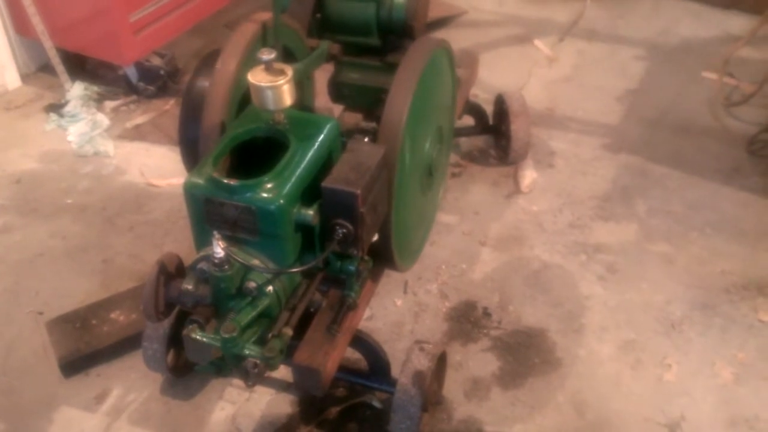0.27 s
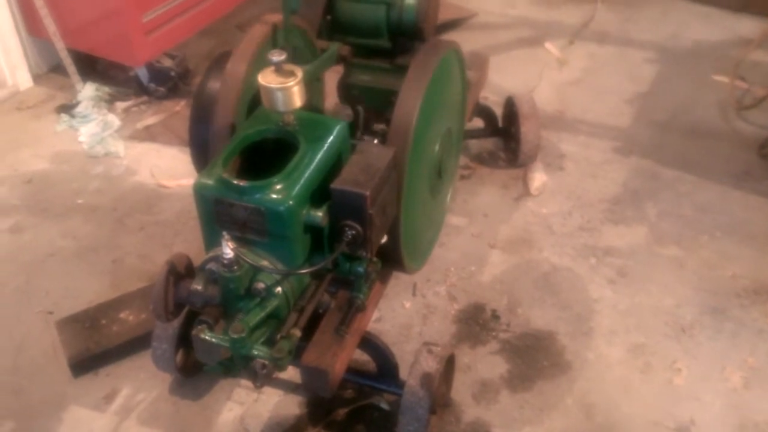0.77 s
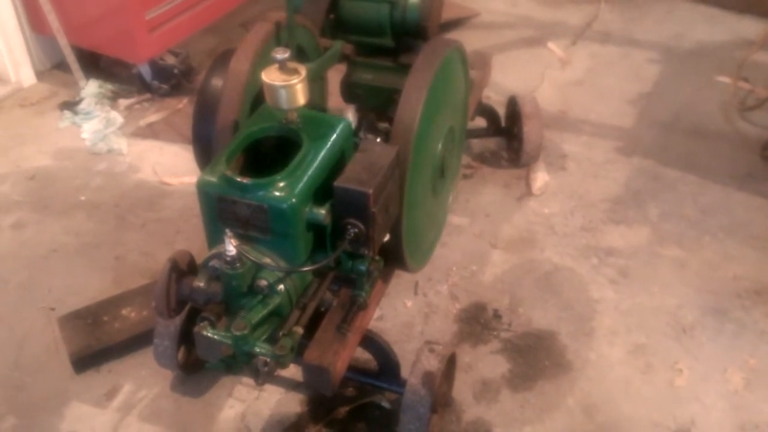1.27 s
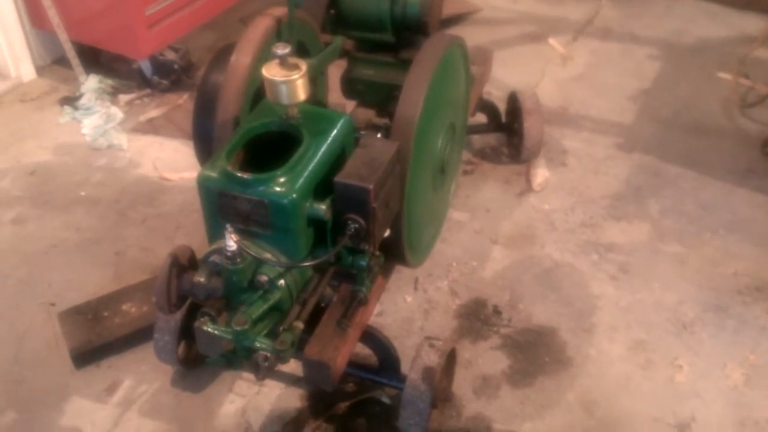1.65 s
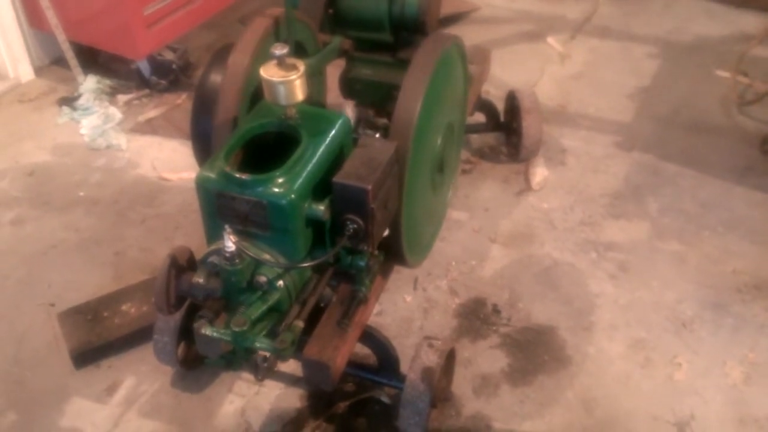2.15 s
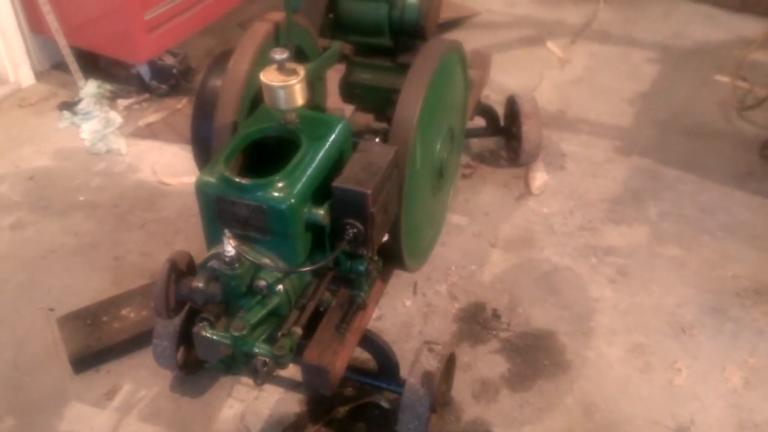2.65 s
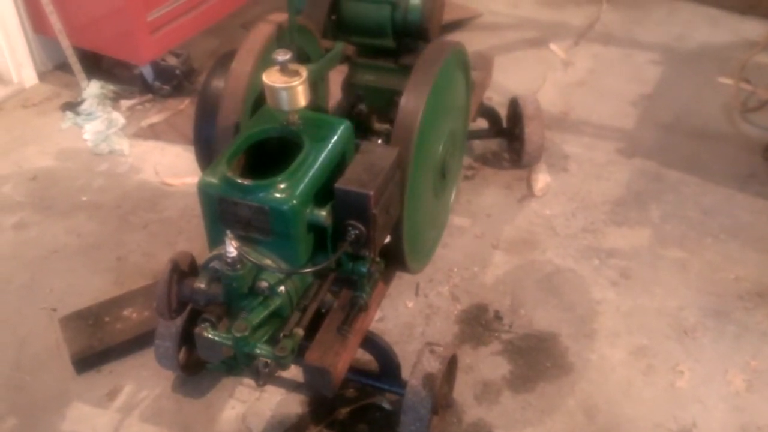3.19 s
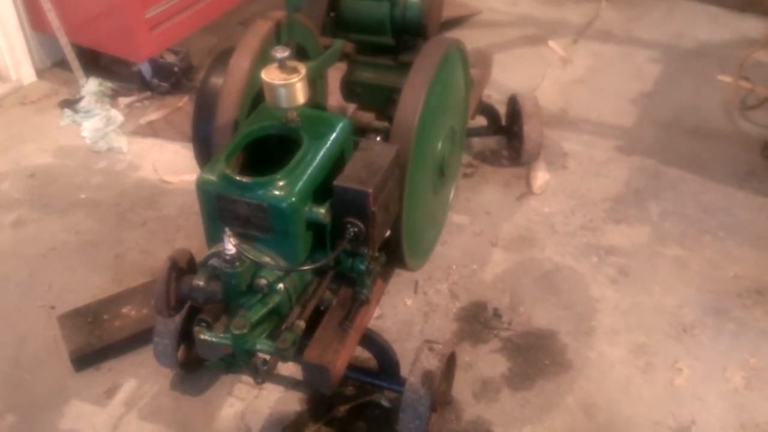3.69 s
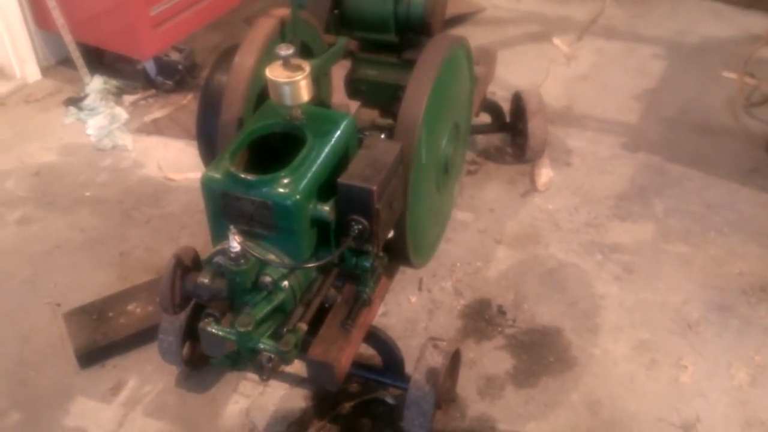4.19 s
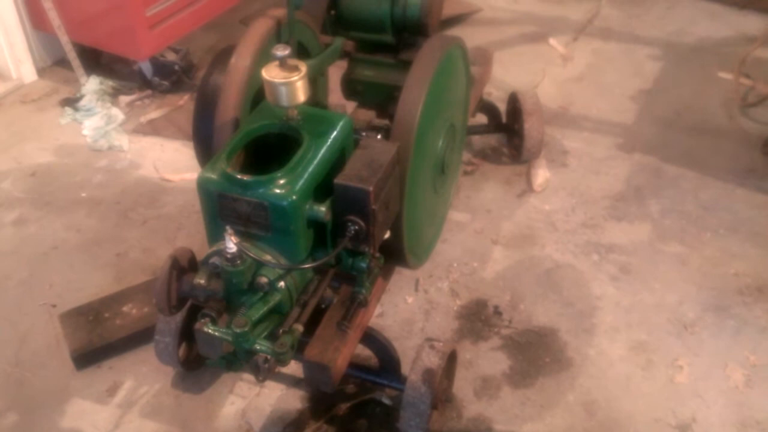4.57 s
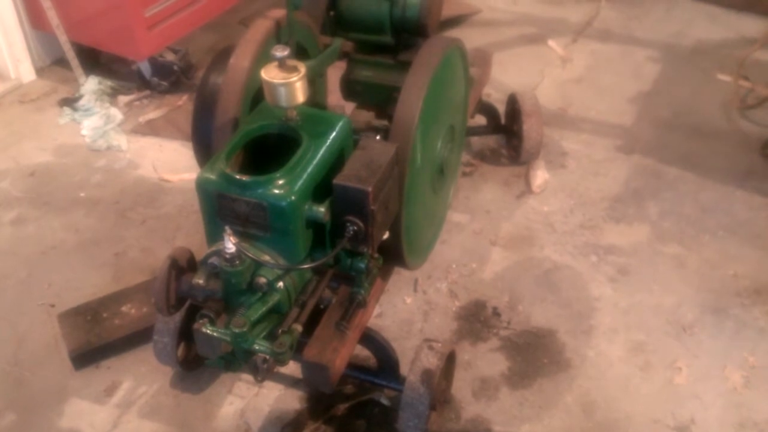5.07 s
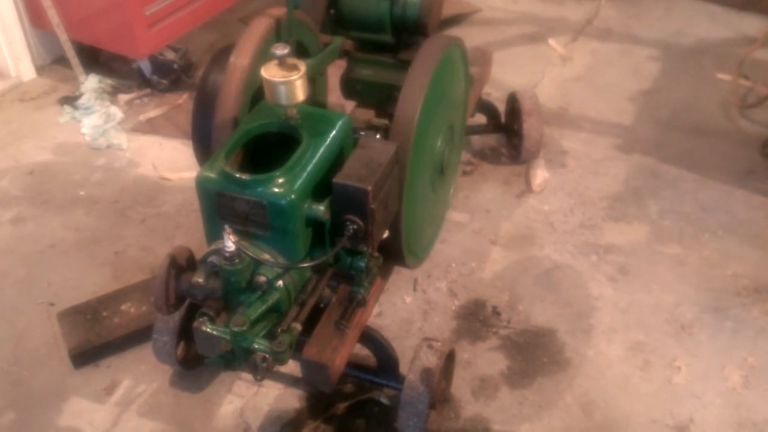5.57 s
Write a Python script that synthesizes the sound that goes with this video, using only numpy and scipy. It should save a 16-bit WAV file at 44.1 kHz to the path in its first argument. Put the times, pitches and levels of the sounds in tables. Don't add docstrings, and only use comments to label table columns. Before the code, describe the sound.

A slow old single-cylinder engine in a hard garage, close and wide, with slightly unlike left and right microphones. A valve clack opens the scene, then at about 0.27 s comes a sharp rising pop and a clipped blast of gas, roaring brightly for a tenth of a second and fading over the next quarter second into a diffuse room tail. It then coasts: faint gear rattle and low hum, husky pipe breaths near 270 Hz, flywheel knocks, small ticks, and latch clacks at 0.7, 1.15 and 1.7 s. A brief gasp at 1.55 s precedes a loud tick and a rush of intake hiss with a low snoring flutter at 1.8-2.0 s; valve clacks at 1.74 and 2.0 s and quick trip clicks lead to the second bang at 2.24 s, its pop duller. The cycle repeats to the strongest blast at 4.21 s, then coasts again, with another intake rush near 5.75 s.

```python
import sys
import numpy as np
from scipy import signal
from scipy.fft import rfft, irfft, next_fast_len
from scipy.io import wavfile
from scipy.ndimage import uniform_filter1d

SR = 44100
rng = np.random.default_rng(int(sys.argv[2]) if len(sys.argv) > 2 else 0)


def transcribe(signal):
    frames = np.atleast_2d(signal).T
    limited = np.clip(frames, -1, 1)
    pcm = np.round(limited * 32767).astype(np.int16)
    wavfile.write(sys.argv[1], SR, pcm)


def field_ratio(decibels):
    return 10 ** (np.asarray(decibels, dtype=float) / 20)


N = 257527
T, SIZE = np.arange(N) / SR, next_fast_len(N + SR)
HZ = np.maximum(np.arange(SIZE // 2 + 1) * SR / SIZE, 1)
APART = np.array([[0], [2.2]])

CYCLE_START = [-1.702, .268, 2.238, 4.208]
# time [s], pop level [dB], blast level [dB].
FIRING = [
    (0.268, -8, 0.0),
    (2.237, -10.5, -0.4),
    (4.211, -8.5, 0.17),
]
# pitch [Hz], level [dB], t60 [s].
FRAME_RING = [(1377, -5, 0.011), (1645, 9.5, 0.082), (2036, 0, 0.023), (2390, 7.5, 0.11),
              (3400, 1.5, 0.034), (4370, -0.5, 0.043), (6320, -23, 0.14), (10540, -20, 0.013)]
# frequency [Hz], density [dB per Hz].
INTAKE_COLOUR = [(290, -45), (500, -1.5), (1120, -19), (1190, -19), (2370, 2), (3070, 2), (3550, 7.5),
                 (9040, 4), (10400, 1.5), (15600, -5.5)]


def over_hz(table, column=1):
    table = np.array(table)
    return np.interp(np.log(HZ), np.log(table[:, 0]), table[:, column])


def unit(gain):
    return gain / np.sqrt(np.mean(np.abs(gain) ** 2))


def through(x, gain):
    return irfft(rfft(x, SIZE) * gain, SIZE)[..., :N]


def peak(hz, width_hz):
    return 1j * HZ * width_hz / (hz ** 2 - HZ ** 2 + 1j * HZ * width_hz)


def curve(spans, fade=0.0052):
    out = np.zeros(N)
    for rows in spans:
        s, db = np.transpose(rows)
        fade_in = np.clip((T - s[0]) / fade, 0, 1)
        fade_out = np.clip((s[-1] - T) / (10 * fade), 0, 1)
        out += field_ratio(np.interp(T, s, db)) * fade_in * fade_out
    return out


def noise(rough_db, rate):
    hold = int(SR / rate)
    flicker = uniform_filter1d(np.repeat(rng.standard_normal(N // 20 + 1), hold)[:N], hold)
    return rng.standard_normal((2, N)) * field_ratio(rough_db * flicker)


def each(rows, starts=CYCLE_START):
    return [np.array(rows) + start * np.eye(len(rows[0]))[0] for start in starts]


def played(rows, starts=CYCLE_START):
    scatter_db = 1.36
    rows = np.concatenate(each(rows, starts))
    is_level = rows < -5
    rows = rows + scatter_db * rng.standard_normal(rows.shape) * is_level
    return rows[(rows[:, 0] > 0) & (rows[:, 0] < N / SR)]


def iron(ring, crack_db):
    # frequency [Hz], density [dB per Hz].
    crack = [(180, -19), (300, -7.5), (1110, -4), (2410, 3.5), (4030, -1.5), (4670, -1.5), (7070, -14.5),
             (11000, -31), (15600, -36.5)]
    modes = 0
    for k, (hz, db, t60) in enumerate(ring):
        width_hz = np.log(1000) / np.pi / t60
        modes = modes + (-1) ** k * field_ratio(db) * peak(hz, width_hz)
    return unit(modes) + field_ratio(crack_db) * unit(field_ratio(over_hz(crack)))


def hits(rows, body, gain_db, rise):
    split_hz, treble_rise = 7000, 0.0038
    low, high, t = np.zeros(N + SR), np.zeros(N + SR), T[:SR // 3]
    for s, treble_db, db, t60 in rows:
        start = max(int((s - 0.51 * rise) * SR), 0)
        span = slice(start, start + len(t))
        fall_db = -60 * t / max(t60, .005)
        low[span] += field_ratio(db + gain_db + fall_db) * np.minimum(t / rise, 1)
        high[span] += field_ratio(treble_db + gain_db + 2 * fall_db) * np.minimum(t / treble_rise, 1)
    bounces = noise(0.97, 700)
    treble = 1 / (1 + (split_hz / HZ) ** 6)
    swell = through(low[:N] * bounces, unit(body * (1 - treble)))
    return swell + through(high[:N] * bounces, unit(body * treble))


def gears():
    # time into the cycle [s], level [dB].
    mesh = [(.0, -17), (.085, -13.5), (.21, -33.5), (.58, -32.5), (.93, -35), (1.06, -46), (1.3, -37.5),
            (1.6, -35.5), (1.86, -32)]
    # frequency [Hz], density [dB per Hz].
    hum_colour = [(15, -44), (25, -2), (55, -36), (96, 7), (184, 3), (412, -5.5), (484, 4), (539, 3),
                  (1670, 0), (3750, -9), (5040, -57.5), (5620, -101), (15600, -30)]
    load = field_ratio(np.interp(T, *np.concatenate(each(mesh)).T))
    teeth = field_ratio(-11) * through(noise(5.5, 300) * load, unit(iron(FRAME_RING, 2.46)))
    floor = field_ratio(-53.5) * through(noise(6.7, 8.5), unit(peak(231, 45) + .5 * peak(111, 23)))
    hum = field_ratio(-47.5) * through(noise(4.4, 22), unit(field_ratio(over_hz(hum_colour))))
    return teeth + floor + hum


def breathing():
    # time into the cycle [s], level [dB], pitch [Hz], length [s].
    pipe = [(.054, -33.5, 252, 0.11), (.135, -39, 330, 0.021), (.307, -35, 295, .08),
            (.505, -38, 277, 0.11), (.751, -32, 270, 0.027), (.99, -31, 270, 0.034),
            (1.25, -37, 267, 0.045), (1.553, -31, 315, 0.05), (1.72, -39, 296, 0.067), (1.9, -46, 313, .03)]
    # [s, dB, Hz, s].
    cylinder = [(.027, -27.5, 148.5, 0.2), (.2, -52, 156, 0.043), (.29, -37, 169, .027),
                (.46, -45.5, 165, 0.041), (.86, -50.5, 156, .05), (1.1, -53.5, 145, 0.056),
                (1.372, -43.5, 145, 0.034), (1.44, -46.5, 178, .035), (1.64, -41, 128, 0.065),
                (1.73, -40.5, 151, 0.027), (1.9, -52.5, 147, 0.065)]
    level_db, detune = -7, 0.045
    tone = np.zeros((2, N))
    strokes = played(pipe + cylinder)
    strokes[:, 2] *= 1 + detune * rng.standard_normal(len(strokes))
    for s, db, hz, length in strokes:
        span = slice(max(int((s - .2) * SR), 0), int((s + .2) * SR))
        t = T[span] - s
        turn = 2 * np.pi * hz * t
        pair = np.sin(turn + APART) + 0.38 * np.sin(1.21 * turn + APART)
        tone[:, span] += field_ratio(db + level_db) * np.exp(-(t / (0.45 * length)) ** 2) * pair
    husky = through(rng.standard_normal((2, N)), unit(1 / (1 + (HZ / 70) ** 4)))
    return tone * (1 + 1.38 * husky)


def intake():
    # time into the cycle [s], pitch [Hz], level [dB].
    flutter = [
        (1.53, 102, -63),
        (1.57, 98.6, -50),
        (1.635, 103.4, -49),
        (1.68, 116, -43),
        (1.705, 114.5, -53),
    ]
    # time into the cycle [s], level [dB].
    gasp = [
        (1.262, -75),
        (1.285, -32),
        (1.3, -45.5),
        (1.38, -62),
        (1.395, -65),
    ]
    # time into the cycle [s], level [dB].
    charge = [
        (1.514, -34),
        (1.54, -32),
        (1.574, -20.5),
        (1.634, -20),
        (1.726, -63),
        (1.732, -36),
    ]
    s, hz, _ = np.concatenate(each(flutter)).T
    turn = 2 * np.pi * np.cumsum(np.interp(T, s, hz)) / SR
    swell = curve([rows[:, ::2] for rows in each(flutter)])
    snore = field_ratio(13) * swell * (np.sin(turn + APART) + 0.83 * np.sin(0.9 * turn + APART))
    waver = .8 + 0.33 * through(rng.standard_normal((2, N)), unit(peak(18, 25) ** 2))
    flow = field_ratio(-6.5) * curve(each(gasp) + each(charge))
    colour = field_ratio(over_hz(INTAKE_COLOUR)) * (1 + 0.7 * peak(10700, 600))
    return through(noise(0.59, 150) * flow, unit(colour)) + snore * waver


def linkage():
    # time [s], treble [dB], body [dB], rattle t60 [s].
    latch = [(0.6985, -32.5, -19.5, 0.15), (1.1533, -29.5, -17, 0.1), (1.676, -32.5, -17.5, 0.14),
             (2.6676, -30, -15.5, 0.14), (3.1233, -32, -18.5, 0.15), (3.647, -33.5, -17.5, 0.17),
             (4.6387, -31, -14, 0.15), (5.0928, -34.5, -18, 0.15), (5.6156, -39.5, -21.5, 0.16)]
    # [s, dB, dB, s].
    valve = [
        (0.036, -21, -15, 0.15),
        (1.7419, -19, -12, 0.17),
        (2.0025, -22, -14, 0.12),
        (3.7115, -19, -9.5, 0.15),
        (3.9736, -24.5, -16.5, 0.14),
        (5.681, -22.5, -11.5, 0.16),
    ]
    # time from the firing [s], treble [dB], body [dB], t60 [s].
    trip = [(-.263, -33.5, -28, 0.33), (-.119, -27, -41, .14), (-.1115, -24.5, -22, 0.17),
            (-.0968, -52.5, -25.5, .22), (-.0451, -16.5, -20, 0.063), (-.037, -25, -18.5, 0.17)]
    # time into the cycle [s], body [dB], treble [dB], rattle t60 [s].
    knock = [(.368, -27.5, -40.5, 0.11), (.584, -33, -43, 0.12), (.813, -33.5, -43, 0.11),
             (1.061, -28.5, -49, 0.065), (1.258, -29.5, -53.5, 0.095), (1.297, -30, -38.5, 0.15),
             (1.804, -38.5, -30, .05)]
    # [s, dB, dB, s].
    crank = [(0.318, -30, -54, 0.32), (0.506, -30, -49, .1), (0.751, -31, -62, 0.34),
             (.982, -34, -48, 0.12), (1.175, -41.5, -79, 0.41)]
    # time into the cycle [s], treble [dB], body [dB], rattle t60 [s].
    tick = [(.4764, -26, -17, .07), (.5446, -22.5, -38, 0.047), (.7107, -38.5, -36, 0.17),
            (.772, -22, -43, .04), (.9367, -22, -14, 0.049), (1.016, -28, -38, 0.092),
            (1.218, -59, -34, 0.2), (1.5103, -13, -8, .06)]
    # pitch [Hz], level [dB], t60 [s].
    latch_ring = [(1220, -10, 0.12), (1470, -4, 0.062), (1700, -15, 0.014), (1907, -3, 0.024),
                  (1954, -2, 0.027), (2320, -3, 0.26), (3020, -18, 0.041), (3590, -9.5, 0.012),
                  (4700, -28, 0.039), (6100, -30, 0.12)]
    valve_ring = [(1434, 0.5, 0.05), (1743, 3, 0.035), (2034, 2, 0.018), (2332, 2, 0.094), (2443, 9, 0.076),
                  (3497, 13, 0.057), (3576, 5, 0.017), (4670, 4.5, 0.039), (8760, -37, 0.015),
                  (10630, -26, 0.055), (11050, -30, 0.045)]
    wheel_ring = [(1395, -2, 0.012), (2036, 4, .05), (2352, -13.5, 0.052), (2484, 10, 0.15),
                  (4630, -23, .08), (6440, 3, 0.081)]
    treble_first = [0, 2, 1, 3]
    knocks, cranks = played(knock)[:, treble_first], played(crank)[:, treble_first]
    trips = played(trip, np.transpose(FIRING)[0])
    bright = unit(field_ratio(over_hz(INTAKE_COLOUR)) + .5 * peak(5970, 300))
    out = hits(latch, iron(latch_ring, 0.1), gain_db=-.1, rise=0.0046)
    out += hits(valve, iron(valve_ring, -7), gain_db=-.1, rise=0.0081)
    out += hits(trips, iron(FRAME_RING, 9.3), gain_db=-0.61, rise=0.0025)
    out += hits(knocks, iron(FRAME_RING, 0.5), gain_db=0.34, rise=0.0068)
    out += hits(cranks, iron(wheel_ring, -10), gain_db=-2.3, rise=0.0014)
    return out + hits(played(tick), bright, gain_db=-10.5, rise=0.0068)


def exhaust():
    # time from the firing [s], level [dB].
    blast = [
        (0, -0.5),
        (.007, -8),
        (.04, -9.5),
        (.075, -12),
        (.25, -44),
        (.335, -36),
    ]
    # frequency [Hz], density [dB per Hz].
    blast_colour = [(18, -59), (30, -46), (133, 2), (208, 5), (494, -10), (812, -25), (1330, 1), (2190, 7),
                    (2930, 6), (4810, 5.5), (6760, 4), (9260, 0.5), (15600, -14.5)]
    # pitch [Hz], width [Hz], level [dB].
    muffler = [(1780, 58, -7), (2240, 960, -15.5), (3250, 95, 2), (4660, 660, -4), (7220, 61, 0.5),
               (9230, 600, -15.5), (10100, 240, -2), (12340, 250, -32)]
    pop_hz, sweep_hz_s, pop_t60, pop_lag = 690, 183600, 0.021, 1
    jet_db, jet_t60, jet_hz = -14, 0.083, 11760
    pop, jet, gas = np.zeros((2, N)), np.zeros(N), np.zeros(N)
    sides = np.array([[1], [-1]])
    for s, pop_db, blast_db in FIRING:
        t = np.clip(T - s + .001, 0, None)
        hz = pop_hz + sweep_hz_s * np.minimum(t, .04) / 2
        whistle = np.sin(2 * np.pi * hz * t - pop_lag * (sides < 0))
        onset = (t > 0) * np.minimum(t / 0.00022, 1)
        pop += sides * field_ratio(pop_db + 5.5 - 60 * t / pop_t60) * onset * whistle
        jet += field_ratio(jet_db - 60 * t / jet_t60) * np.clip(t / 0.0018 - .5, 0, 1)
        gas += field_ratio(blast_db) * curve(each(blast, [s]))
    holes = 1 + 1.3 * sum(field_ratio(db) * peak(hz, width) for hz, width, db in muffler)
    hiss = through(noise(2.5, 300) * jet, unit(peak(jet_hz, 3800) ** 2))
    roar = through(noise(1.9, 260) * gas, unit(field_ratio(over_hz(blast_colour)) * holes))
    return pop + hiss + roar


def garage(wet_db, delay=0.0062):
    # frequency [Hz], t60 [s], level [dB].
    room = [(128, 0.69, -11.5), (300, 0.61, 3), (590, 0.82, 3), (1980, 0.66, -1), (5900, 0.61, -1),
            (14850, 0.08, 13)]
    t, tail = np.arange(SR) / SR, 0
    at_hz, t60s, dbs = np.transpose(room)
    for hz in 90 * 2 ** np.arange(8):
        t60 = np.interp(np.log(hz), np.log(at_hz), t60s)
        db = np.interp(np.log(hz), np.log(at_hz), dbs)
        decay = field_ratio(db - 60 * t / t60) * np.clip(t / delay - 1, 0, 1)
        band = np.exp(-(np.log2(HZ / hz) / 0.98) ** 2)
        tail = tail + band * rfft(rng.standard_normal((2, SR)) * decay, SIZE) / np.sqrt(SR)
    return 1 + field_ratio(wet_db) * tail


def scene():
    # frequency [Hz], correlation [-1 to 1].
    likeness = [(30, -.15), (60, -.55), (100, -.8), (290, -.8), (640, -.6), (1410, .03), (3100, -.08),
                (15000, .01)]
    # frequency [Hz], left minus right [dB].
    tilt = [(60, 4.5), (200, -2), (500, -1), (1290, -1), (2380, -3), (4400, 0), (6000, 3.5), (7500, -5),
            (9000, -11), (11000, -19), (15000, -13)]
    engine = gears() + breathing() + intake() + linkage() + exhaust()
    near, other = through(engine, garage(10.79))
    alike = np.clip(over_hz(likeness), -1, 1)
    right = through(near, alike) + through(other, np.sqrt(1 - alike ** 2))
    half_db = over_hz(tilt) / 2
    return np.array([through(near, field_ratio(half_db)), through(right, field_ratio(-half_db))])


def low_pass(x):
    return signal.sosfilt(signal.butter(12, 15780, fs=SR, output="sos"), x)


def record(dry):
    bass_hz, ceiling = 36, .97
    capsule = 1 / (1 + (bass_hz / (1j * HZ)) ** 2 + 0.84 * bass_hz / (1j * HZ))
    held = np.clip(through(dry, capsule), -ceiling, ceiling)
    # (s from the firing, dB)
    top_gap, top_gap_hz = [(.07, 0), (.35, 0)], 14500
    loss = curve(each(top_gap, np.transpose(FIRING)[0]))
    held = held - loss * through(held, HZ > top_gap_hz)
    return low_pass(held)


dry = scene()
out = record(dry)
transcribe(out)
```